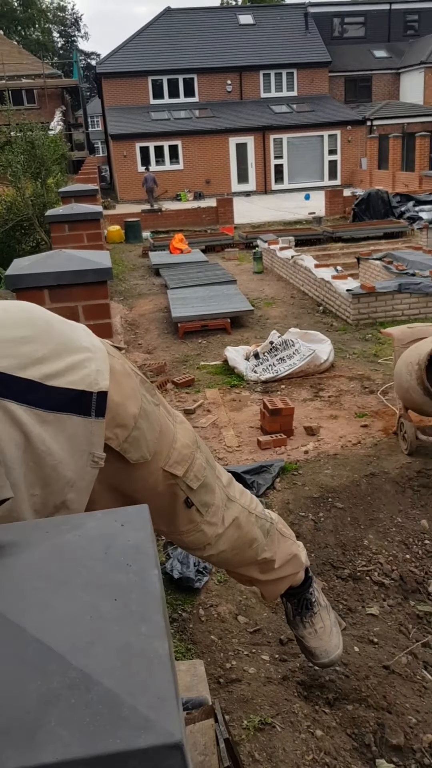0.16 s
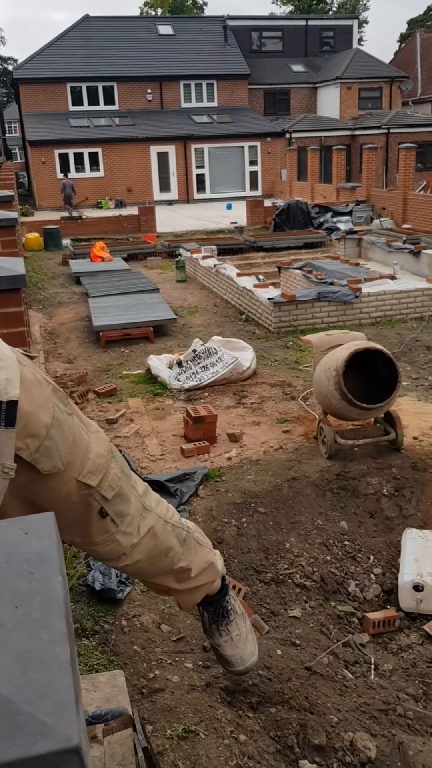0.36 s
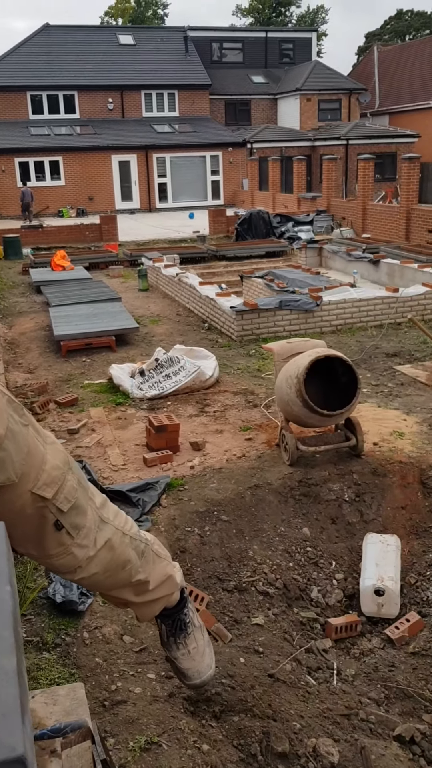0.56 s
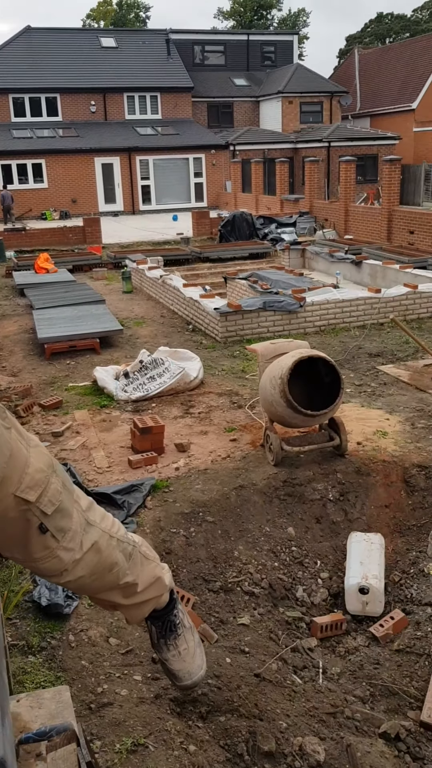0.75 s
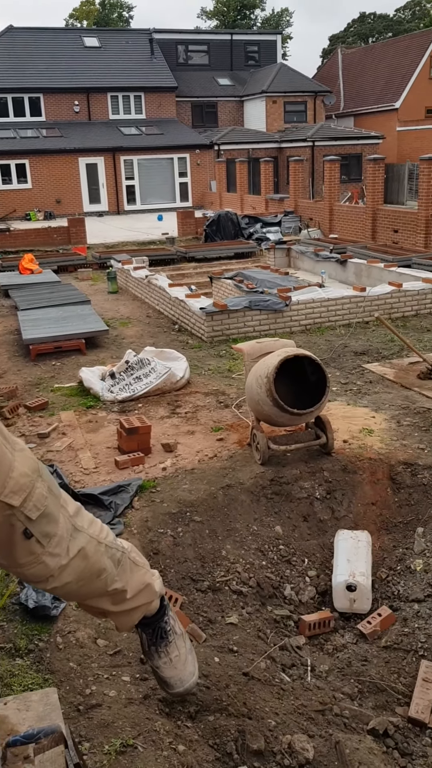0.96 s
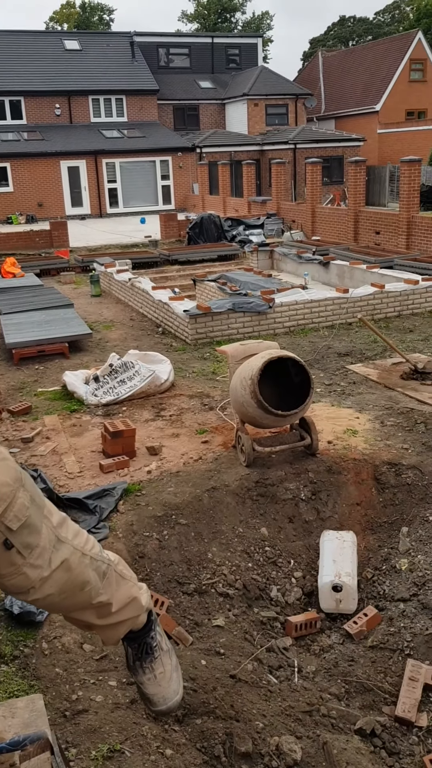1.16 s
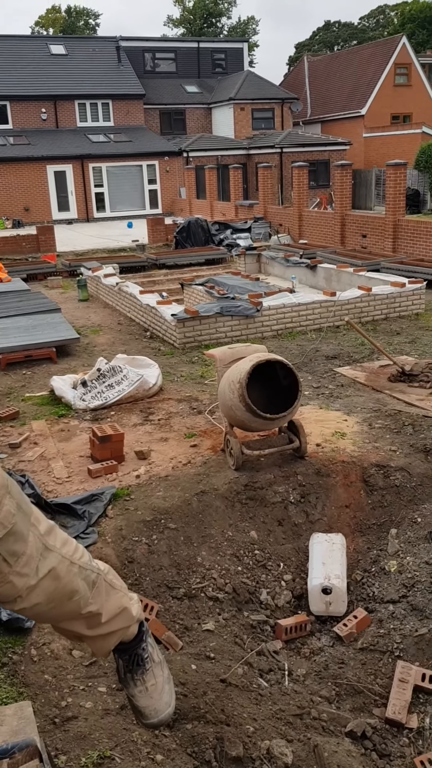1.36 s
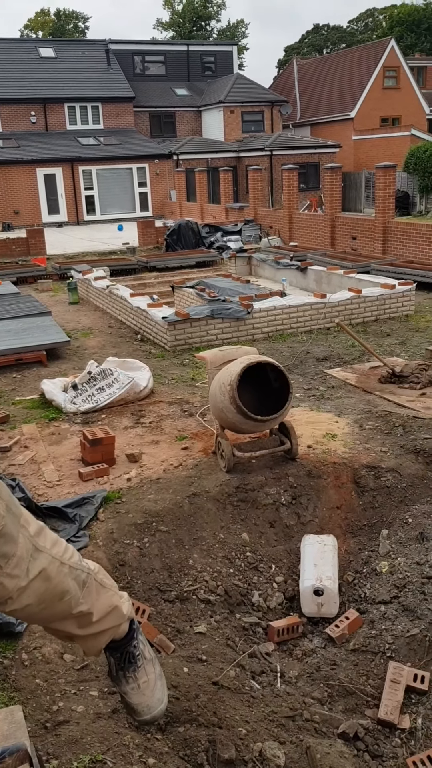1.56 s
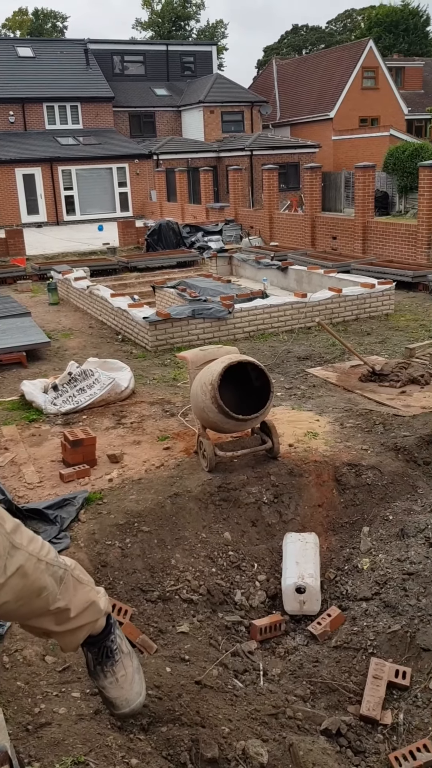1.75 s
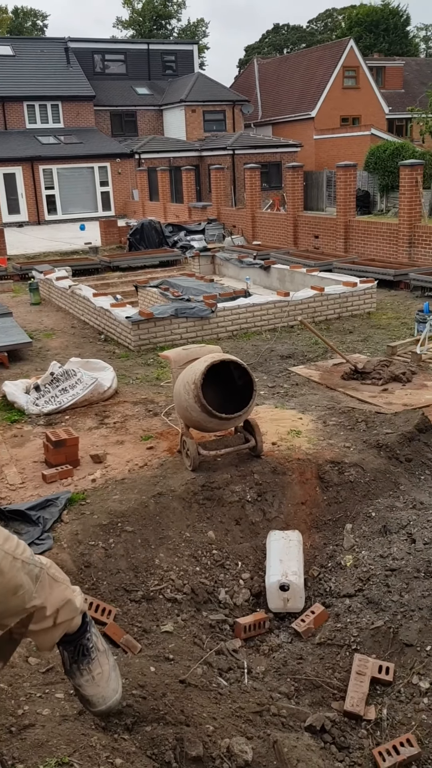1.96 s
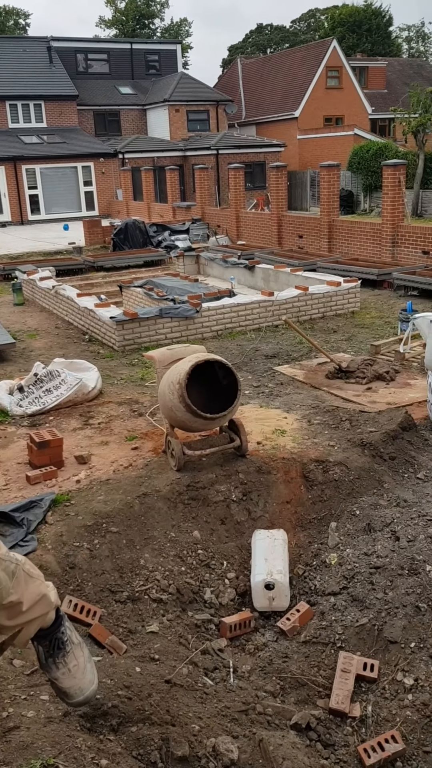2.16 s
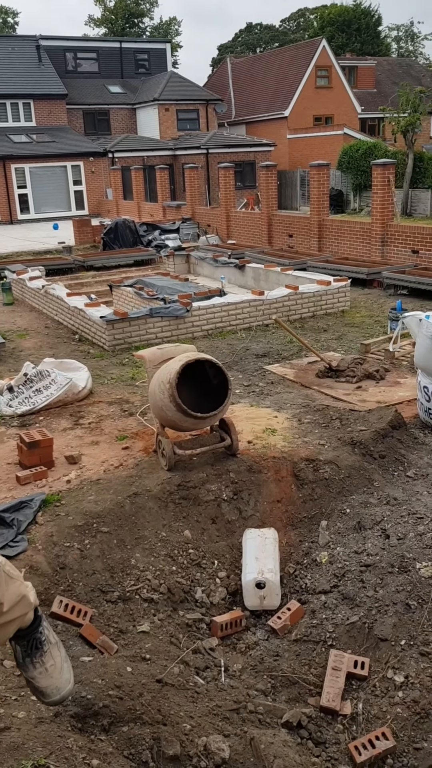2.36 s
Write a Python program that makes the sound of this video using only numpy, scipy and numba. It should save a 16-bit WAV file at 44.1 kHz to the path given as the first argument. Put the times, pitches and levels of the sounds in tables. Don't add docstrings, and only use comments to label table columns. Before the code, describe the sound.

A steel trowel on gritty concrete, very close: a sharp tick at 0.22 s, then a bright, ringing, rasping drag from 0.24 to 0.7 s, loudest and crunchiest around 0.54 s. Quiet follows. Much softer rubs with ticks and dull knocks come at 1.2-1.45, 1.57-1.85 and 2.23-2.47 s. Faint yard echoes, low town rumble, engine hum, thin hiss, and barely audible high bird whistles from 1.3 s.

```python
import sys
import numpy as np
from scipy import signal
from scipy.fft import rfft, irfft
from scipy.io import wavfile
from scipy.ndimage import uniform_filter1d
from numba import njit

SR = 44100
rng = np.random.default_rng(int(sys.argv[2]) if len(sys.argv) > 2 else 0)


def put_to_file(sound):
    columns = np.atleast_2d(sound).T
    safe = np.clip(columns, -1, 1)
    whole_steps = np.round(safe * 32767)
    wavfile.write(sys.argv[1], SR, whole_steps.astype(np.int16))


def linear_from_db(decibels):
    return 10 ** (np.asarray(decibels, float) / 20)


N = 110250
t = np.arange(N) / SR

# start_s, grit_db, blade_db, contact_db, slab_db, contact_hz
LONG_DRAG = [
    (.24, -55, -14, -12, 0, 4030),
    (.256, -68.5, 7, 4, 6, 3950),
    (.3, -54, -15, 5, -10, 3760),
    (.34, -58.5, 8, 9, -2, 3600),
    (.42, -50, 5.5, 4, 2.5, 3750),
    (.535, -46, 1.5, 6, -39, 4070),
    (.57, -45, 6, 0, -9, 4120),
    (.66, -52.5, 10.5, -3, -2, 4200),
    (.708, -70.5, -7, -20, 7.5, 4000),
]
# start_s, grit_db, blade_db, contact_db, slab_db
LIGHT_RUBS = [
    [(1.202, -78, 2, 15, 14), (1.225, -71.5, -11, 5.5, 1), (1.25, -67, -6, 8, 7), (1.285, -70, 2, 0, 5),
     (1.31, -69, -12, 4, 4), (1.345, -70.5, -8, -9, 7.5), (1.4, -79.5, -14, 8.5, -5),
     (1.5, -86.5, -14, 3, -3)],
    [(1.573, -72.5, 17, -2, 7), (1.6, -68.5, 14, -13, 11), (1.645, -66, 15, -32, 0.5),
     (1.7, -73.5, 12.5, -7, 15.5), (1.728, -64, 8.5, 5, -1), (1.745, -63.5, -4, -3, -11),
     (1.8, -71, -21, -17, -21), (1.865, -74.5, -14, -10, -15)],
    [(2.229, -71.5, -2, -3, -21), (2.25, -72, -2, 3, -21), (2.287, -75.5, -2, -2, -15),
     (2.33, -86, 1, 8, -2), (2.365, -91, -3, 10, -13), (2.38, -72, -17, 0, 13), (2.41, -79.5, -12, 5, 6),
     (2.47, -80.5, -12, -6, 1)],
]
STROKES = [LONG_DRAG] + [[tuple(row) + (4200,) for row in rub] for rub in LIGHT_RUBS]
GRAINS_PER_S, GRAIN_SPREAD_DB = 9000, 2.1
JUDDER_DB, JUDDER_PER_S = 1.3, 70
PORT_LAG_S, SHARED, SHARED_TREBLE = .00046, .75, .2
# pitch_hz, level_db per Hz
GRIT_LEFT = [(200, -13), (1200, -3.5), (3400, 7), (5000, -5), (6500, -6.5), (9000, -3), (13000, 2),
             (16000, -1)]
GRIT_RIGHT = [(200, -8), (1200, -2), (3400, 8), (5500, 3.5), (6600, -11), (7500, -2.5), (9000, -23.5),
              (16000, -1.5)]
COARSE_PATCHES = [5650, 7350, 9200]
# pitch_hz, width_hz, level_db, left_minus_right_db
BLADE_TONES = [
    (2285, 150, -14, 10),
    (2500, 300, -20, -10),
    (2695, 36, 0, 6),
    (2960, 89, -18, -6),
]
RUB_DAMPING = 6.5
CONTACT_WIDTH_HZ, CONTACT_PAN_DB = 380, -2
# pitch_hz, width_hz, level_db
SLAB_TONES = [
    (605, 630, -4.5),
    (1240, 220, -1.5),
    (1650, 150, -9.5),
]
# start_s, peak_db, left_minus_right_db, thud_db
TAPS = [(0.0432, -66, -7, 12), (0.2275, -34.5, -3, -12), (0.4994, -42, 13, -20), (.5866, -46, 14, -20),
        (0.631, -40, 8, -14), (0.6807, -50.5, 23, 3), (1.2027, -59.5, -3, 8.5), (1.244, -64.5, -7, 16),
        (1.2995, -53, 0, 7), (1.5823, -49.5, -5, 8), (1.715, -59, -12, 12.5), (1.733, -45, 16, -16),
        (2.2299, -54, -15, -1), (2.376, -71, -1, 5)]
TAP_DB, TAP_TICK_S = -3, .003
TAP_TAIL_S, TAP_TAIL_DB = .016, -9
THUD_HZ, THUD_WIDTH_HZ = 600, 510
# start_s, peak_db, pitch_hz, width_hz, left_minus_right_db
CAUGHT_GRAINS = [(.284, -44.5, 7300, 60, -8), (.303, -47, 7300, 80, 5), (.3147, -45, 3930, 120, -2),
                 (.3611, -35, 3850, 150, 2), (.3891, -31, 3900, 150, 5), (.402, -38.5, 2840, 39.7, 6),
                 (.4464, -39, 4200, 149, -1), (.4658, -35, 9300, 200, 11), (.467, -35, 8000, 200, 8),
                 (.4948, -40, 4050, 200, -1), (.5327, -20.5, 4300, 250, -1), (.5365, -18, 4800, 300, -6),
                 (.5425, -32, 4080, 250, 4), (.534, -29, 2710, 29.8, 5), (.5522, -27, 2620, 120, 3),
                 (.554, -29, 2200, 250, 12), (.5635, -25, 2470, 120, 3), (.5705, -24, 2706, 68, 5),
                 (.572, -27.5, 2150, 250, 9), (.5895, -31, 2656, 49.6, 5), (.597, -38, 2620, 80, 3),
                 (.631, -32.5, 2704, 40.7, 3), (1.2035, -41, 3810, 199, -5), (1.205, -43, 4930, 250, -14),
                 (1.251, -54, 4250, 100, -7), (1.3, -54, 4430, 80, -1), (1.3227, -46, 2440, 200, -6),
                 (1.4465, -53, 4340, 200, -8), (1.584, -43, 2713, 100, 12), (1.594, -45, 2780, 100, -1),
                 (1.63, -46, 2730, 80, 10), (1.7148, -37.5, 2720, 120, 4), (1.7325, -44, 4500, 200, 10),
                 (1.735, -50, 5460, 120, 10), (1.745, -46, 4600, 250, 8), (2.2303, -47, 3150, 200, 13),
                 (2.231, -55, 4330, 250, -4), (2.26, -44.5, 3070, 250, 8.5), (2.379, -58, 4670, 200, -11)]
CATCH_RISE_S, CATCH_ROUGH_DB = .001, 2
# start_s, peak_db, pitch_hz, width_hz,
# left_minus_right_db
MORE_CAUGHT_GRAINS = [(1.712, -43, 2400, 170, 4), (1.72, -50, 3300, 200, -6), (1.733, -45, 11500, 300, 13),
                      (1.257, -52, 5300, 46, -9), (1.203, -56.5, 2900, 40, -5), (2.9, -55, 1700, 220, 0),
                      (0.22, -33, 4020, 200, -3), (.227, -46, 3300, 150, 2), (.232, -40, 6000, 110, -5),
                      (1.243, -45, 390, 35, 2), (1.301, -48, 330, 60, 2), (1.9, -39, 3300, 170, -4),
                      (1.203, -36, 740, 200, 2), (1.245, -40, 504, 89, 1), (1.299, -43, 640, 150, 9),
                      (1.58, -43, 1600, 150, 15), (1.582, -45.5, 1100, 100, 16), (1.717, -40.5, 1180, 110, 15),
                      (1.69, -44, 1220, 100, 13), (1.298, -49, 5900, 230, -13)]
YARD_T60_S, YARD_DB, YARD_HZ = 0.72, -21.5, 4500
# start_s, length_s, start_hz, end_hz, level_db
BIRD_WHISTLES = [
    (1.29, .18, 8050, 7800, -78),
    (1.45, .2, 8000, 7200, -79),
    (1.78, .11, 7900, 7800, -81),
    (2.3, .08, 4650, 4500, -79),
]
# pitch_hz, level_db per Hz
TOWN_MID = [(24, -43), (38, -10), (60, -3.5), (150, -7), (560, -16.5), (1300, -18.5), (1800, -30.5),
            (3500, -63)]
# pitch_hz, level_db per Hz
TOWN_SIDE = [(24, -18), (40, -12), (115, -6), (200, -7), (400, -10), (900, -7.5), (1700, -12.5),
             (3500, -40)]
TOWN_DB, TOWN_SIDE_DB, TOWN_PAN_DB = -54, -11.5, 2
# pitch_hz, width_hz, level_db
ENGINE_HUMS = [
    (50.2, 27, -59.5),
    (112.2, 17.5, -60.5),
    (296.2, 56, -63),
]
# pitch_hz, level_db per Hz
HISS = [(1060, -35), (1800, -11.5), (2500, -13.5), (3590, -10), (4550, -11), (4940, -8), (7430, -21.5),
        (12800, -13.5), (15800, -16)]
HISS_DB, HISS_PAN_DB = -70, 0.5


def level(x, db):
    return x * linear_from_db(db) / np.sqrt(np.mean(x ** 2))


@njit
def moving_resonance(x, hz, width):
    y, ring, low = np.empty(len(x)), 0., 0.
    for i in range(len(x)):
        g, k = np.tan(np.pi * hz[i] / SR), width[i] / hz[i]
        v = (ring + g * (x[i] - low)) / (1 + g * (g + k))
        ring, low, y[i] = 2 * v - ring, low + 2 * g * v, k * v
    return y


def band(x, hz, width_hz):
    return moving_resonance(x, hz + 0 * t, width_hz + 0 * t) * np.sqrt(SR / np.pi / width_hz)


def colour(x, table):
    tab = np.array(table, float)
    hz = np.arange(2049) * SR / 4096 + 1
    db = np.interp(np.log(hz), np.log(tab[:, 0]), tab[:, 1], left=-70, right=tab[-1, 1])
    folded = irfft(db * np.log(10) / 20)
    folded[1:2048] *= 2
    folded[2049:] = 0
    h = irfft(np.exp(rfft(folded)))
    return signal.fftconvolve(x, h / np.sqrt(np.sum(h ** 2)))[:N]


def walk(rate):
    k = int(SR / rate)
    steps = np.repeat(rng.standard_normal(N // 50)[:N // k + 1], k)
    return 1.5 * uniform_filter1d(uniform_filter1d(steps, k), k)[:N]


def pan(db):
    return linear_from_db(np.array([[db / 2], [-db / 2]]))


def grit():
    chance, size, noise = rng.random(N), rng.exponential(size=N), rng.standard_normal(N)
    hit = np.clip((GRAINS_PER_S / SR - chance) * 50, 0, 1)
    return level(hit * noise * linear_from_db(GRAIN_SPREAD_DB * size) + 0.38 * noise, 0)


def ports(shared):
    both, share = grit(), np.clip(shared, 0, 1)
    late = np.roll(both, int(PORT_LAG_S * SR))
    return [np.sqrt(share) * b + np.sqrt(1 - share) * grit() for b in (late, both)]


def touching():
    on = 0
    for stroke in STROKES:
        start, end = stroke[0][0], stroke[-1][0]
        fade = np.exp(-np.maximum(t - end, 0) / .02)
        on = on + (t >= start) * fade * (t < end + .06)
    return on


def blade_ring(x, damping, port):
    out = 0
    for j, (hz, width_hz, db, pan_db) in enumerate(BLADE_TONES):
        side = pan(np.where(t > 1, -pan_db, pan_db))[port, 0]
        out = out + (-1) ** j * linear_from_db(db) * side * band(x, hz, width_hz * damping)
    return out


def coarse_grit():
    noise = grit_treble = 0
    return noise + grit_treble


def strokes():
    rows = np.concatenate([np.array(s, float) for s in STROKES])
    grit_db, blade_db, contact_db, slab_db, contact_hz = (np.interp(t, rows[:, 0], rows[:, k])
                                                          for k in range(1, 6))
    push = touching() * linear_from_db(grit_db + JUDDER_DB * walk(JUDDER_PER_S))
    slip = linear_from_db(blade_db + 1.5 * walk(90))
    chatter = linear_from_db(contact_db + 1.6 * walk(150))
    damping = np.where(t > 1, RUB_DAMPING, 1)
    contact_width = CONTACT_WIDTH_HZ * np.where(t > 1, RUB_DAMPING / 2, 1)
    out = []
    sources = zip(ports(SHARED), ports(SHARED_TREBLE), (GRIT_LEFT, GRIT_RIGHT))
    for port, (x, fine, table) in enumerate(sources):
        x = x * push
        patches = sum(.16 * linear_from_db(4 * walk(35)) * band(fine, hz * (1 + .015 * walk(8)), hz / 11)
                      for hz in COARSE_PATCHES)
        hiss = colour((fine + patches) * push, table)
        blade = blade_ring(x * slip, damping, port)
        contact = pan(CONTACT_PAN_DB)[port] * band(x * chatter, contact_hz, contact_width)
        slab = sum(linear_from_db(db) * band(x * linear_from_db(slab_db), hz, width_hz) for hz, width_hz, db in SLAB_TONES)
        out.append(linear_from_db(7.5) * hiss + linear_from_db(-5.0) * blade + linear_from_db(1.5) * contact + slab)
    return np.array(out)


def taps():
    out, source = np.zeros((2, N)), ports(SHARED)
    for start, db, pan_db, thud_db in TAPS:
        age = np.maximum(t - start, 0)
        fade = np.exp(-age / TAP_TICK_S) + linear_from_db(TAP_TAIL_DB) * np.exp(-age / TAP_TAIL_S)
        env = (t >= start) * linear_from_db(db + TAP_DB) * fade
        for port, table in enumerate((GRIT_LEFT, GRIT_RIGHT)):
            out[port] += pan(pan_db)[port] * colour(source[port] * env, table)
        out += linear_from_db(thud_db) * band(source[1] * env, THUD_HZ, THUD_WIDTH_HZ)
    return out


def catches():
    out, rough = np.zeros((2, N)), linear_from_db(CATCH_ROUGH_DB * walk(500))
    lag = np.array([[PORT_LAG_S], [0]])
    for start, db, hz, width_hz, pan_db in list(CAUGHT_GRAINS) + list(MORE_CAUGHT_GRAINS):
        age = np.maximum(t - start - lag, 0)
        env = (1 - np.exp(-age / CATCH_RISE_S)) * np.exp(-np.pi * width_hz * age)
        out += pan(pan_db) * linear_from_db(db + 3) * env * np.sin(2 * np.pi * hz * age)
    return out * rough


def yard_echoes(near):
    tail = rng.standard_normal((2, N)) * linear_from_db(-60 * t / YARD_T60_S) * (t > .012)
    tail = np.array([level(band(v, YARD_HZ, 8000), 0) / np.sqrt(N) for v in tail])
    return linear_from_db(YARD_DB) * signal.fftconvolve(near, tail, axes=1)[:, :N]


def bird():
    out, noise = 0, rng.standard_normal(N)
    for start, length, start_hz, end_hz, db in BIRD_WHISTLES:
        u = np.clip((t - start) / length, 0, 1)
        hz = start_hz + (end_hz - start_hz) * u ** 2 + 90 * walk(40)
        whistle = level(band(band(noise, hz, 190), hz, 190), 0)
        out = out + linear_from_db(db) * np.sqrt(np.sin(np.pi * u).clip(0)) * whistle
    return out * pan(6)


def town():
    noise = rng.standard_normal((4, N))
    mid = level(colour(noise[0], TOWN_MID) * linear_from_db(.6 * walk(9)), TOWN_DB)
    for hz, width_hz, db in ENGINE_HUMS:
        hum = band(band(rng.standard_normal(N), hz, width_hz), hz, width_hz)
        mid = mid + level(hum * linear_from_db(2.16 * walk(5)), db)
    side = level(colour(noise[1], TOWN_SIDE), TOWN_DB + TOWN_SIDE_DB)
    hiss = np.array([level(colour(v, HISS) * linear_from_db(0.69 * walk(3.5)), HISS_DB) for v in noise[2:]])
    return (mid + side * np.array([[1], [-1]])) * pan(TOWN_PAN_DB) + hiss * pan(HISS_PAN_DB)


def scene():
    near = strokes() + taps() + catches()
    return near + yard_echoes(near) + bird() + town()


def roll_off(x):
    return signal.sosfilt(signal.butter(12, 16480, fs=SR, output="sos"), x)


def record(dry):
    rounded = .13 * np.tanh(dry / .13)
    low_pass = signal.ellip(10, .2, 60, 15750, fs=SR, output="sos")
    return roll_off(signal.sosfilt(low_pass, rounded))


dry = scene()
out = record(dry)
put_to_file(out)
```